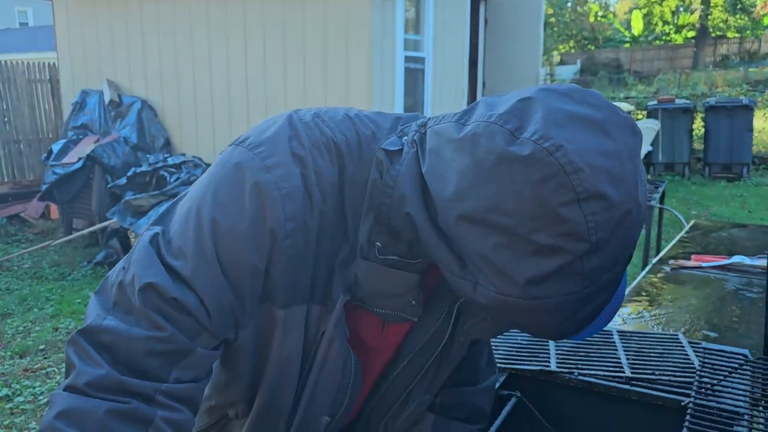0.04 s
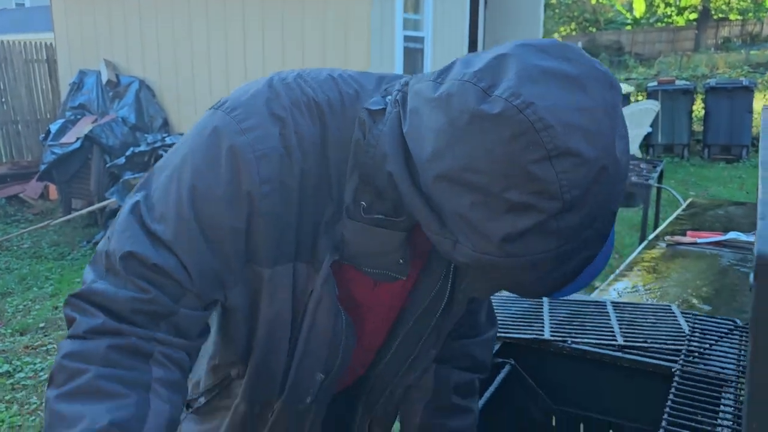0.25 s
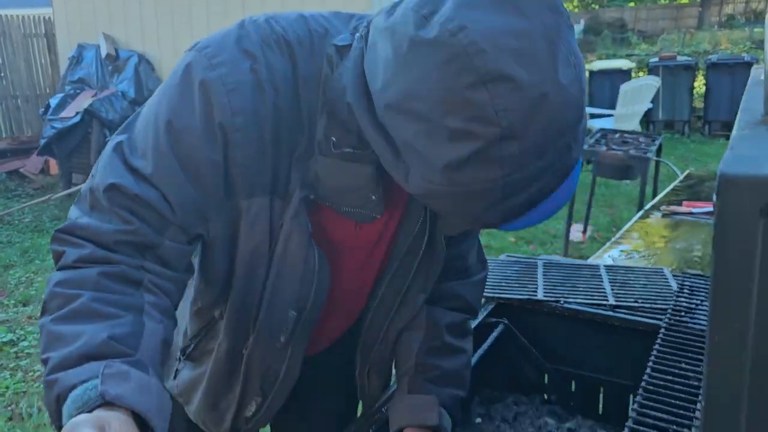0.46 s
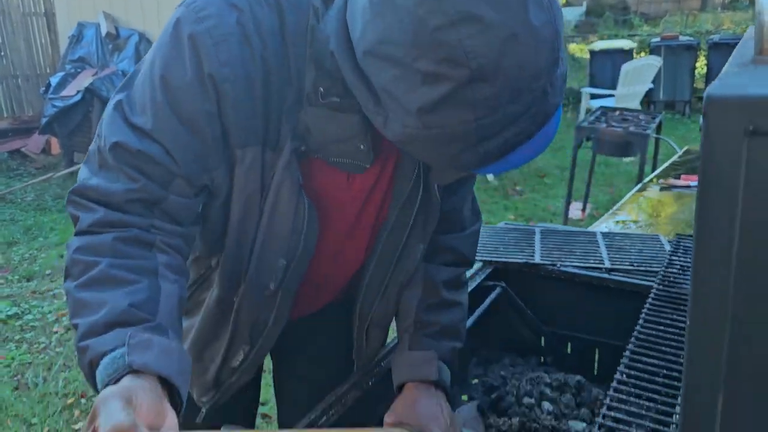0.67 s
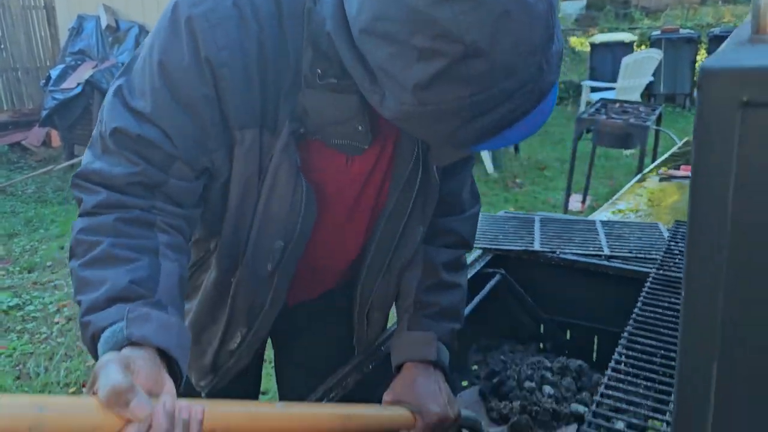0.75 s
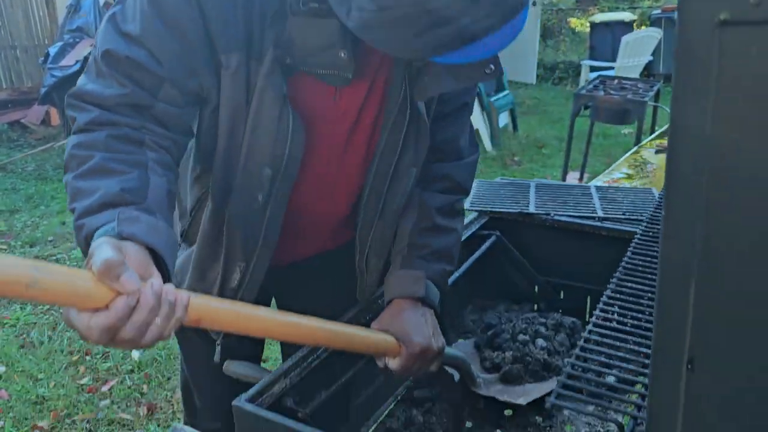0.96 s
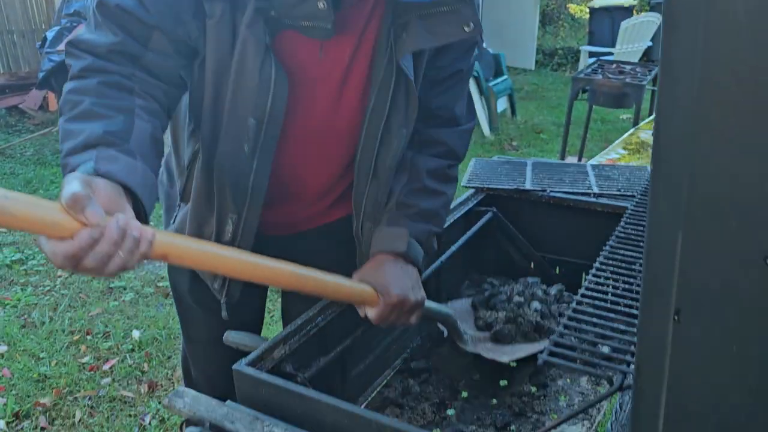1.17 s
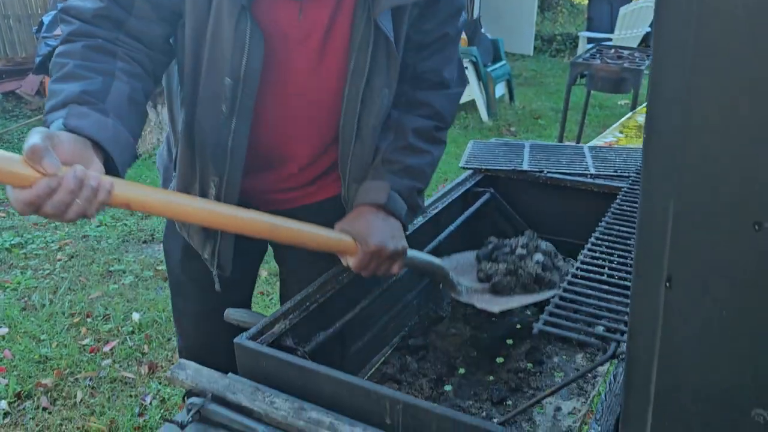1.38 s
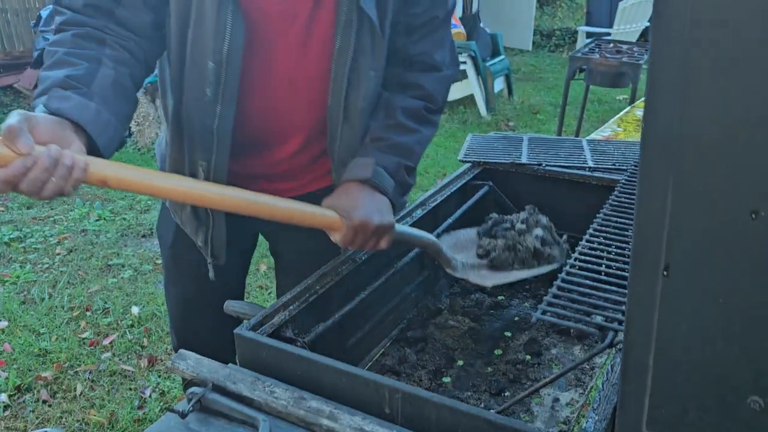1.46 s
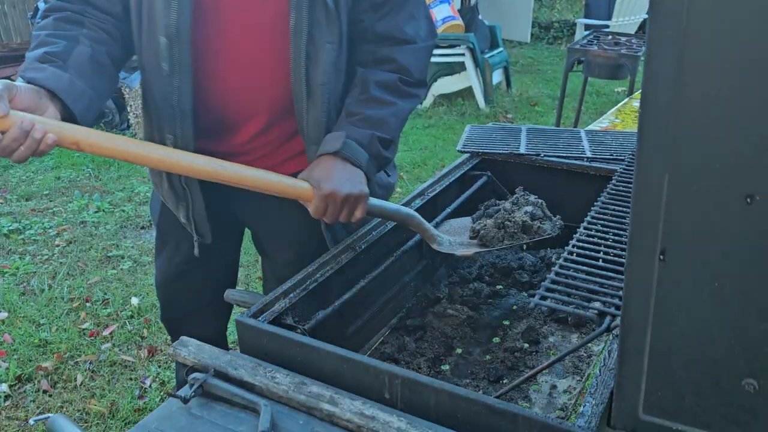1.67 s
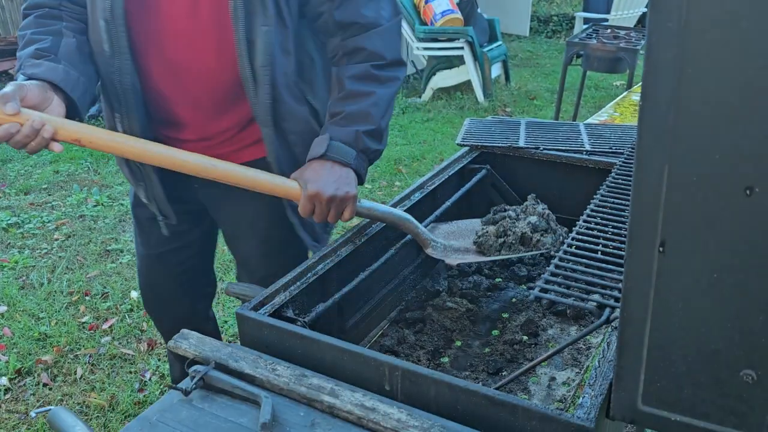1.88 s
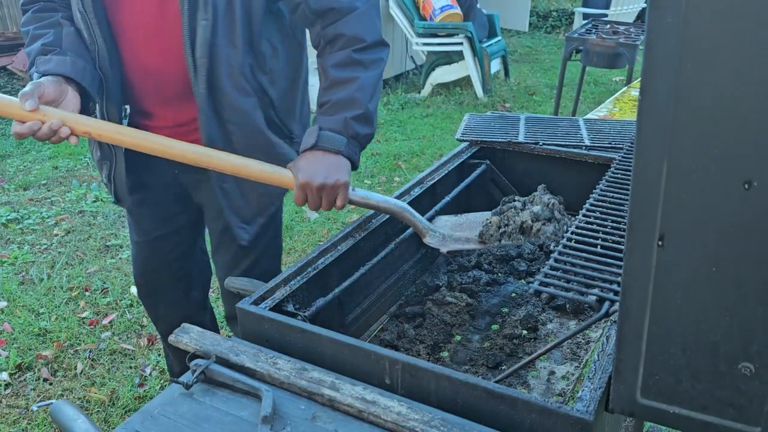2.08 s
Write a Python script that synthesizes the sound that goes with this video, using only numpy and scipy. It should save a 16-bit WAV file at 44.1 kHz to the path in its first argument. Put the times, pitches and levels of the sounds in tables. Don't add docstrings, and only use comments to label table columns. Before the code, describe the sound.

Close up outdoors, a shovel blade grinds twice over gritty ash on steel, crumbs tick, light knocks follow, and the blade lands again at the end, over low traffic rumble, faint crickets and bird whistles.

```python
import sys
import numpy as np
from scipy import signal
from scipy.fft import rfft, irfft, next_fast_len
from scipy.io import wavfile
from scipy.ndimage import uniform_filter1d

SR = 44100
rng = np.random.default_rng(int(sys.argv[2]) if len(sys.argv) > 2 else 0)


def attenuation_scalar(level_db):
    decades = np.asarray(level_db, float) / 20
    return 10 ** decades


def transcribe(signal):
    frames = np.atleast_2d(signal).T
    limited = np.clip(frames, -1, 1)
    pcm = np.round(limited * 32767).astype(np.int16)
    wavfile.write(sys.argv[1], SR, pcm)


N = 93183

UNLIKE = 0.83
PORT_PAN_DB = 1


def on_log(hz, table):
    table = np.array(table)
    return np.interp(np.log(np.maximum(hz, 1)), np.log(np.maximum(table[:, 0], 1)), table[:, 1])


def unit(x):
    return x / np.sqrt(np.mean(x ** 2) + 1e-18)


def decay(t, t60):
    return np.exp(-np.log(1000) * t / t60)


def pan(db):
    return attenuation_scalar(np.array([[db], [-db]]) / 2)


def shape(x, db_of):
    n = next_fast_len(x.shape[-1])
    hz = np.arange(n // 2 + 1) * SR / n + 1
    return irfft(rfft(x, n) * attenuation_scalar(db_of(hz)), n)[..., :x.shape[-1]]


def bell(hz, centre_hz, octaves, depth_db):
    return -depth_db * (1 - np.exp(-(np.log2(hz / centre_hz) / octaves) ** 2 / 2))


def even(x):
    s = rfft(x)
    power = uniform_filter1d(np.abs(s) ** 2, size=24, axis=-1)
    return irfft(s / np.sqrt(power + power.mean() / 20), x.shape[-1])


def walk(rate):
    k = int(SR / rate)
    held = np.repeat(rng.standard_normal(N // k + 1), k)
    return 2.36 * uniform_filter1d(uniform_filter1d(held, k), k)[:N]


def follow(curve, **ends):
    return attenuation_scalar(np.interp(np.arange(N) / SR, *np.array(curve).T, **ends))


def add(out, x, s):
    i = min(max(int(s * SR), 0), N)
    out[:, i:i + x.shape[1]] += x[:, :N - i]


def rings(hz, t60):
    t = np.arange(4096) / SR
    return np.sin(2 * np.pi * hz[:, None] * t) * decay(t, t60[:, None])


def air(db_of):
    same_hz, bass_side = 1100, 0.28
    mid, side = rng.standard_normal((2, N))
    side = shape(side, lambda f: 20 * np.log10(bass_side + (1 - bass_side) * f ** 2 / (f ** 2 + same_hz ** 2)))
    return shape(mid + side * np.array([[1], [-1]]), db_of)


def grit(env, scatter_db):
    clicks_per_s = 14000
    chance, sign = rng.random((2, len(env)))
    size = np.minimum(rng.exponential(size=len(env)), 3)
    x = env * np.sign(sign - .5) * (chance < clicks_per_s / SR) * attenuation_scalar(scatter_db * size)
    return unit(x) * np.sqrt(np.mean(env ** 2))


def steel_modes():
    # (frequency [Hz], level [dB], t60 [s])
    blade_tones = [(723.8, 3.5, 0.23), (1323, 1.5, 0.2), (2230, 4.5, 0.049), (2962, -4.5, 0.12)]
    # (frequency [Hz], width [Hz], level [dB])
    plate_tones = [(1500, 100, -2.5), (1912, 240, -1), (2886, 120, -5), (3172, 230, -4), (4470, 45, -7.5),
                   (4720, 140, -3.5), (6054, 160, -7.5), (7330, 110, -7.5), (7600, 140, -11),
                   (9000, 120, -11.5), (10530, 290, -12), (11530, 84, -4)]
    blade_hz, blade_db, blade_t60 = np.array(blade_tones).T
    plate_hz, width_hz, plate_db = np.array(plate_tones).T
    blade_bank = rings(blade_hz, blade_t60 * 0.57)
    plate_bank = rings(plate_hz, 3.3 / np.maximum(width_hz, 70))
    return [(blade_db, blade_bank, -7), (plate_db, plate_bank, -6.5)]


def steel(centre_hz, modes):
    # (frequency [Hz], level [dB per Hz])
    grit_colour = [(300, -32), (600, 4), (1100, -13.5), (1500, -7.5), (3000, -13), (6000, -12),
                   (12000, -7.5), (16000, -15.5)]
    common, *own = rng.standard_normal((3, 4096))
    fade = decay(np.abs(np.arange(4096) - 32) / SR, 0.0047)
    click = even((common + UNLIKE * np.array(own)) * fade)
    body = unit(shape(click, lambda f: on_log(f, grit_colour)))
    for db, bank, bank_db in modes:
        spot_db = 2.5 * (rng.standard_normal(len(db)) + UNLIKE * rng.standard_normal((2, len(db))))
        body = body + attenuation_scalar(bank_db) * unit(attenuation_scalar(db + spot_db) @ bank)

    def focus(f):
        broad = bell(f, centre_hz, .9, 16)
        peak = bell(f, centre_hz, 0.059, 5.5)
        thin = -10 * np.log10(1 + (1000 / f) ** 4)
        return broad + peak + thin

    body = shape(np.pad(body, ((0, 0), (64, 64))), focus)
    lag = int(SR * (-.00008 + .00003 * rng.standard_normal()))
    body = np.array([body[0], np.roll(body[1], lag)]) * pan(PORT_PAN_DB)
    return body / np.sqrt(np.mean(np.sum(body ** 2, axis=1)))


def break_lump(out, s, db, rise, t60, hz, modes):
    t = np.arange(6000) / SR
    env = np.where(t < rise, t / rise, decay(t - rise, t60))
    clicks = grit(env, 2.6)
    burst = signal.fftconvolve(clicks[None], steel(hz, modes), axes=1)
    add(out, burst * attenuation_scalar(db - 7.0), s - 64 / SR)


def crunches(modes):
    # (time [s], peak level [dB], rise [s], t60 [s], brightest frequency [Hz])
    crunch_events = [(0, -30, .0003, .06, 9000), (0.0339, -18, 0.00052, 0.06, 4100),
                     (0.048, -23, .003, 0.073, 7060), (0.0919, -9, 0.0008, 0.05, 3110),
                     (0.099, -6.5, .002, 0.06, 4070), (0.1055, -4.5, 0.0008, 0.03, 11500),
                     (0.1075, -5, .001, .05, 7000), (.121, -17, 0.0013, 0.07, 10700),
                     (0.1305, -11, .003, 0.06, 7000), (0.177, -15.5, 0.003, 0.06, 4070),
                     (.183, -18.5, .003, .055, 2500), (0.2177, -24.5, 0.0027, 0.06, 3200),
                     (0.6187, -30, .003, .06, 3980), (0.628, -31.5, .004, .08, 3240),
                     (0.654, -16, .004, 0.08, 3400), (0.662, -19, 0.003, 0.05, 2900),
                     (0.6652, -1, 0.002, 0.03, 11500), (0.6738, -3.5, 0.002, 0.046, 3450),
                     (0.682, -11.5, .003, .09, 3400), (.701, -11, 0.005, 0.081, 3210),
                     (0.7395, -17, 0.002, 0.04, 7000), (0.7453, -3.5, .002, .04, 4450),
                     (.754, -11, .003, .05, 4500), (0.7563, -0.5, 0.004, 0.045, 4450),
                     (0.767, -9.5, 0.003, 0.045, 3000), (.781, -21.5, .004, 0.06, 8000),
                     (0.808, -22, 0.006, 0.04, 3100), (0.835, -29, 0.003, 0.04, 3200),
                     (.8445, -29, .002, .03, 3200), (0.8645, -21, 0.003, 0.055, 1900),
                     (2.0505, -32, 0.001, 0.07, 1600), (2.077, -32, .003, .05, 4340)]
    out = np.zeros((2, N))
    for s, db, rise, t60, hz in crunch_events:
        break_lump(out, s, db, rise, t60, hz, modes)
    return out


def slides(modes):
    # (time [s], level [dB], brightest frequency [Hz])
    strokes = [
        [(0, -40, 5000), (.03, -42, 5000), (.09, -35, 4000), (.16, -31, 5000), (.226, -38, 5000),
         (.238, -51, 2000), (.36, -54, 2500), (.56, -57.5, 2000)],
        [(.585, -60, 8000), (.6, -49.5, 6000), (.65, -33, 3400), (.72, -34, 3200), (.79, -43, 3300),
         (.83, -49, 3200), (.875, -46, 2500), (.895, -63, 2510), (.96, -62, 2500)],
        [(1.62, -80, 9000), (1.67, -68, 9000), (1.775, -68, 11000), (1.79, -85, 11000)],
        [(1.94, -77.5, 820), (2.0, -66, 1000), (2.045, -57, 1400), (2.065, -42, 4400), (2.085, -36, 5200),
         (2.11, -34, 5000)],
    ]
    out = np.zeros((2, N))
    window = np.sqrt(np.hanning(2048))
    judder = attenuation_scalar(1. * walk(60.83))
    for stroke in strokes:
        s, db, hz = np.array(stroke).T
        for k in range(-1, int((s[-1] - s[0]) * SR / 1024) + 1):
            t = s[0] + (k * 1024 + np.arange(2048)) / SR
            sliding = (t >= s[0]) * (t <= s[-1] + .01)
            level = attenuation_scalar(np.interp(t, s, db)) * judder[(t * SR).astype(int) % N]
            push = grit(window * level * sliding, 2.)
            push = push[max(int(-t[0] * SR), 0):]
            patch = steel(np.interp(t[1024], s, hz), modes)
            add(out, signal.fftconvolve(push[None], patch, axes=1), t[0])
    return out


def yard():
    # (frequency [Hz], level [dB per Hz])
    yard_colour = [(15, -23), (30, -1), (80, -2.5), (180, -17), (600, -34), (1700, -43.5), (5000, -46),
                   (16000, -69)]
    swell_db, out = .5 * walk(3.4), 0
    for hz in 25 * 2 ** np.arange(10.):
        band = air(lambda f: on_log(f, yard_colour) + bell(f, hz, 1.0, 32))
        out = out + attenuation_scalar(swell_db + 1.2 * walk(7.7)) * band
    return unit(out) * attenuation_scalar(-39)


def drone():
    # (time [s], level [dB])
    drone_level = [(0, -43), (.08, -39.5), (.24, -40.5), (.42, -47.5), (0.651, -38), (.85, -49), (1.1, -52),
                   (1.27, -54), (1.502, -55.5), (1.77, -45), (1.85, -50), (2.11, -38.5)]
    # (frequency [Hz], width [octaves], level [dB])
    drone_bands = [(86, 2, -2.5), (219, 0.84, -2.5), (567, 1.62, -7)]
    out = 0
    for hz, octaves, db in drone_bands:
        band = unit(air(lambda f: bell(f, hz, octaves, 33) - 10 * np.log10(f)))
        out = out + band * attenuation_scalar(db)
    return out * follow(drone_level)


def crickets():
    # (frequency [Hz], width [Hz], level [dB], chirp rate [per s], depth [dB])
    cricket_kinds = [(6100, 120, -74, 16, 5), (7400, 260, -78, 9, 6), (11800, 900, -79, 6, 2)]
    out = 0
    for hz, width_hz, db, rate, depth_db in cricket_kinds:
        band = unit(air(lambda f: bell(f, hz, 2 * width_hz / hz, 80)))
        out = out + band * attenuation_scalar(db + depth_db * np.tanh(4 * walk(2 * rate)))
    return out


def knocks():
    # (time [s], peak level [dB], contact [s])
    knock_events = [
        (.228, -27, 0.0031),
        (.867, -36, .0004),
        (1.119, -33, 0.0005),
        (1.569, -26, 0.0065),
        (1.669, -44, .0006),
        (2.0517, -22, 0.0005),
        (2.057, -22, 0.0008),
        (2.064, -25, .0012),
        (2.081, -31, .0015),
    ]
    # (frequency [Hz], level [dB], t60 [s])
    box_tones = [(137, -2, 0.3), (404, -9, .5), (524, 1.5, 0.4), (765, 1.5, 0.3), (1025, -16, 0.05),
                 (1430, -7, 0.061), (1910, 1, 0.08), (3000, -8, 0.08)]
    out, (hz, mode_db, t60) = np.zeros((2, N)), np.array(box_tones).T
    bank = rings(hz, np.minimum(t60 * 0.84, .09))
    for s, db, contact in knock_events:
        ash = rng.standard_normal(4096) * decay(np.arange(4096) / SR, 0.19)
        spot_db = 2.5 * rng.standard_normal(len(hz))
        ring = unit(attenuation_scalar(mode_db + spot_db) @ bank) + attenuation_scalar(3) * unit(ash) * 3
        push = np.sin(np.pi * np.clip(np.arange(512) / SR / contact, 0, 1)) ** 2
        hit = signal.fftconvolve(ring, push) * pan(PORT_PAN_DB)
        add(out, hit * attenuation_scalar(db) / np.abs(hit).max(), s)
    return out


def crumbs(modes):
    # (time [s], peak level [dB], t60 [s], brightest frequency [Hz])
    crumb_events = [(.268, -61, 0.057, 8800), (.43, -45, 0.082, 10800), (.4714, -45.5, 0.17, 1500),
                    (.5157, -45, 0.041, 11000), (.588, -36, 0.3, 7940), (.9747, -44, 0.22, 3180),
                    (.9846, -48, .1, 5000), (1.01, -54.5, .06, 12050), (1.0605, -55, .05, 12200),
                    (1.117, -52, 0.14, 1400), (1.12, -40, 0.057, 4220), (1.6686, -41, 0.078, 2900),
                    (1.7, -66, 0.088, 11000), (1.765, -54, 0.067, 11600)]
    out = np.zeros((2, N))
    for s, db, t60, hz in crumb_events:
        break_lump(out, s, db, 0.0038, t60, hz, modes)
    return out


def bird():
    # (time [s], frequency [Hz], level [dB])
    whistles = [
        [(0.56, 2020, -67), (0.59, 2250, -66), (0.62, 2510, -61)],
        [(0.985, 2300, -56), (1.012, 2490, -58.5), (1.06, 2320, -56.5), (1.095, 2290, -61)],
        [(1.25, 2180, -69), (1.285, 2480, -57), (1.295, 2520, -50)],
        [(1.325, 2600, -61), (1.346, 2440, -48.5), (1.365, 2330, -69)],
        [(1.56, 2090, -76), (1.594, 2320, -53.5), (1.62, 2460, -58), (1.65, 2330, -59.5), (1.71, 2120, -63)],
        [(2.018, 2300, -62.5), (2.028, 2450, -43), (2.036, 2480, -62)],
    ]
    t, out = np.arange(N) / SR, 0
    for whistle in whistles:
        s, hz, db = np.array(whistle).T
        edge = np.clip(np.minimum(t - s[0], s[-1] - t) / .006 + 1, 0, 1)
        pitch = np.interp(t, s, hz) * (1 + .009 * walk(100))
        out = out + edge * attenuation_scalar(np.interp(t, s, db)) * np.sin(2 * np.pi * np.cumsum(pitch) / SR)
    out = out * attenuation_scalar(2.6 * walk(70))
    tail = rng.standard_normal((2, 16384)) * decay(np.arange(16384) / SR, 0.4)
    return out + attenuation_scalar(-3) * signal.fftconvolve(out[None], unit(tail) / 128, axes=1)[:, :N]


def engine():
    # (time [s], level [dB])
    engine_level = [(1.76, -62), (1.8, -37), (1.96, -38), (2.03, -42), (2.11, -38)]
    return unit(air(lambda f: bell(f, 100, .55, 61.5))) * follow(engine_level, left=-90)


def scene():
    modes = steel_modes()
    shovel = crunches(modes) + slides(modes) + crumbs(modes)
    background = yard() + drone() + crickets() + engine()
    return shovel + knocks() + bird() + background * pan(0.5)


def band_limit(x):
    return signal.sosfilt(signal.butter(12, 16500, fs=SR, output="sos"), x)


def record(dry):
    drive, top_hz = .3, 15900
    soft = np.tanh(drive * dry) / drive
    low_pass = signal.ellip(8, .2, 60, top_hz, fs=SR, output="sos")
    mix = np.clip(signal.sosfilt(low_pass, soft), -1, 1)
    return band_limit(mix)


dry = scene()
out = record(dry)
transcribe(out)
```